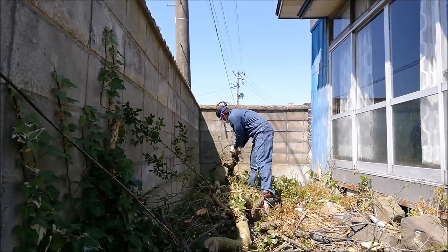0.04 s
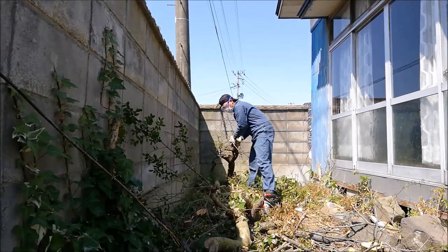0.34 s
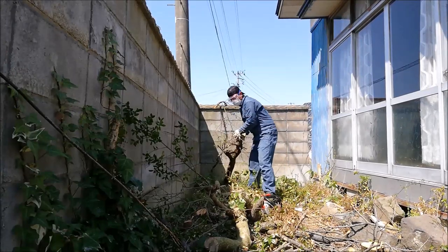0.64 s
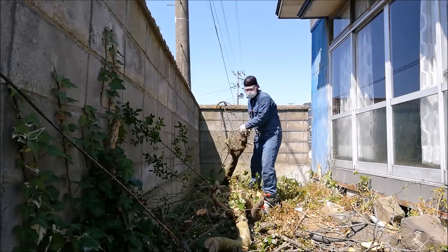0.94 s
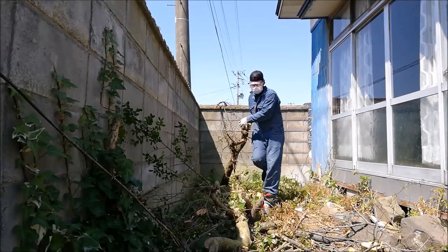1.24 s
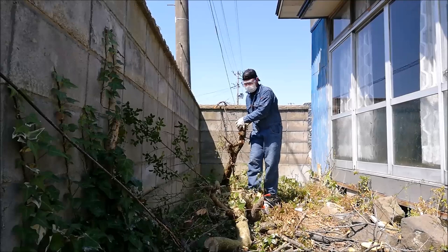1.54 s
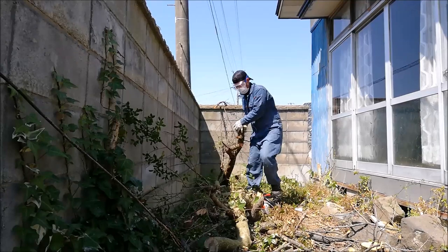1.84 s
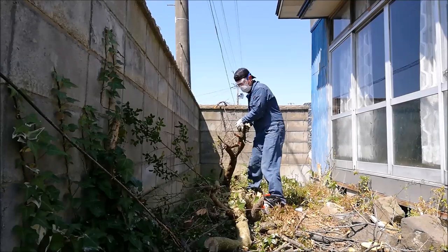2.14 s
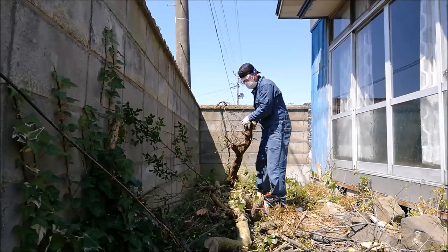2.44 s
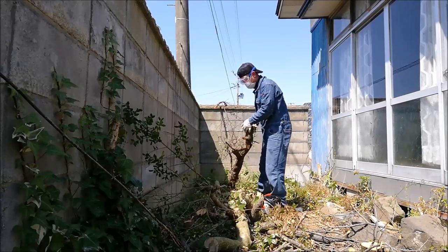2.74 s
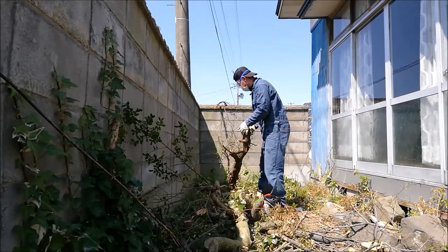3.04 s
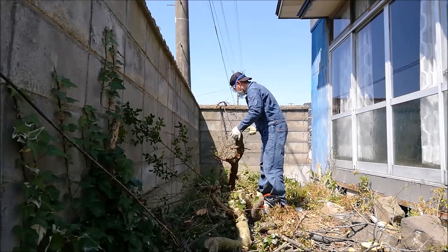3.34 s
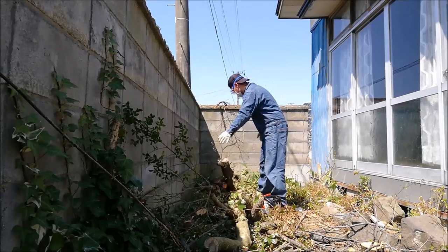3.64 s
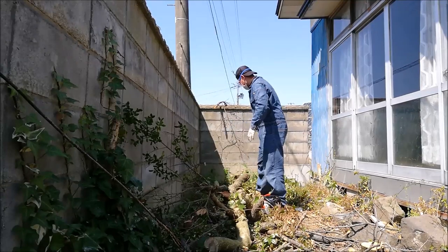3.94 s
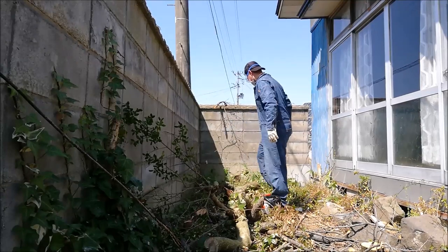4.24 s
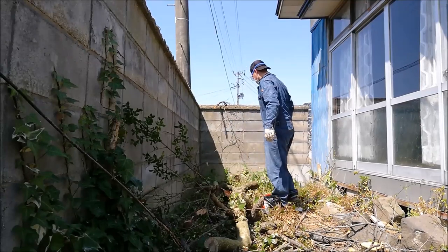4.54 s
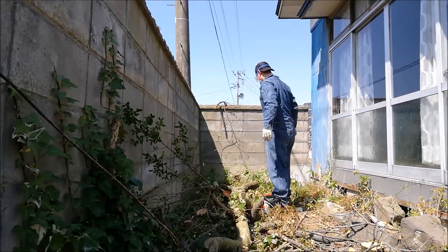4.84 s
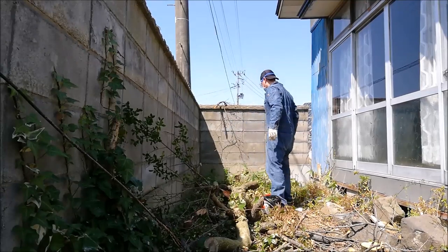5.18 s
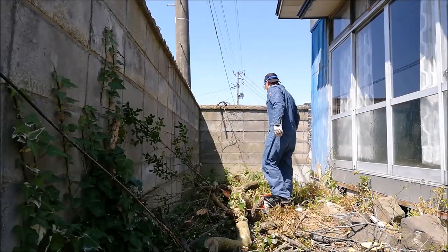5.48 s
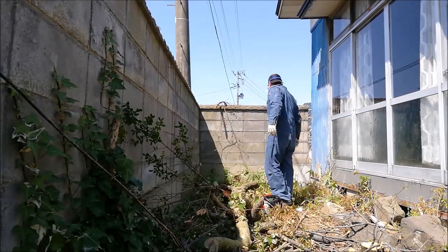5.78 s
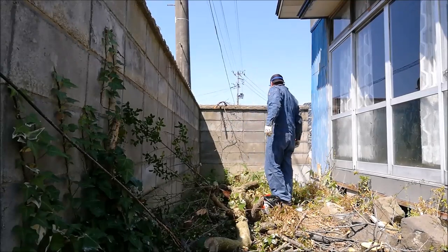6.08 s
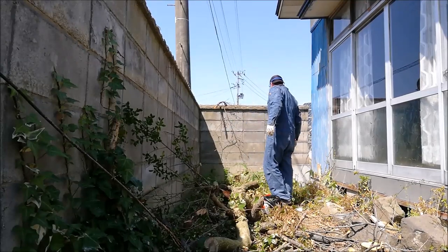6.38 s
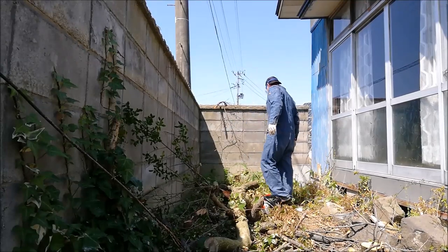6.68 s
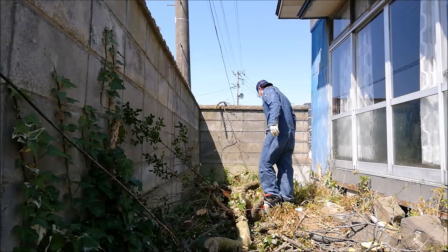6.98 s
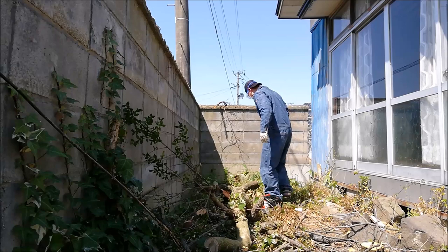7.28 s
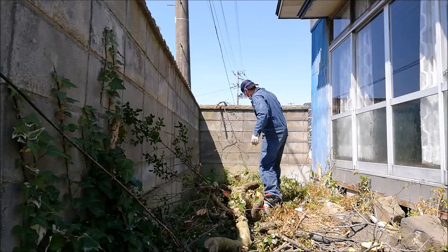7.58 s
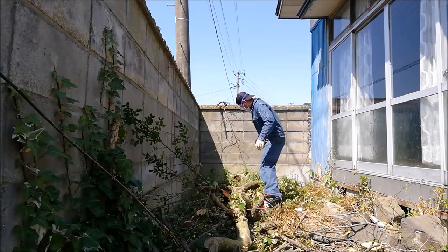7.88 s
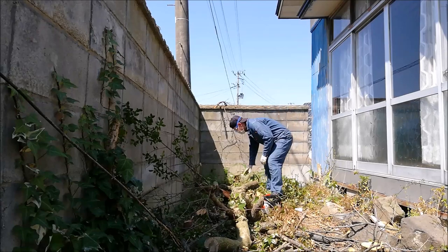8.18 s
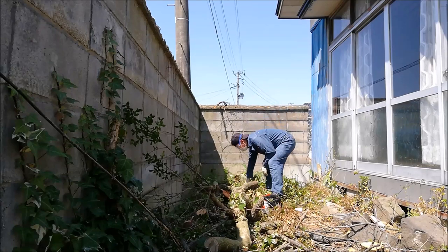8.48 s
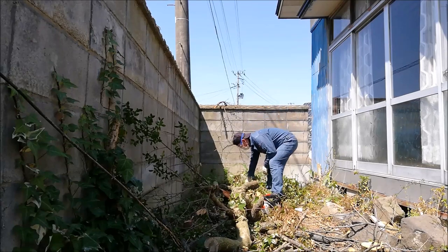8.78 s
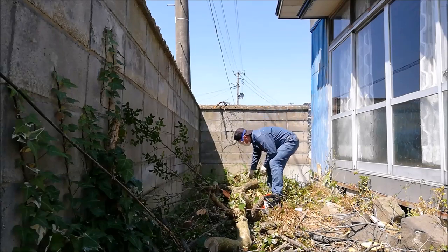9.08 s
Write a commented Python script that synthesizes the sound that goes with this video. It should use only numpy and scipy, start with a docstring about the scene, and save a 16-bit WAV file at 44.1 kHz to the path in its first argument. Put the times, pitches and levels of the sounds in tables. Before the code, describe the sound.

Close by in a narrow walled yard, a dry cut branch is dragged through brush, with crackling leaves, scraping twigs and sharp snaps. It drops with a bright clink and a short crash. Feet then tread on the litter and wood knocks dully underfoot. A faint machine hum and far traffic continue behind, and a distant engine swells in the second half. The stereo is wide, with quick echoes.

```python
"""Leaves crackle and twigs scrape and snap as a dry cut branch is dragged through brush and dropped.
Then feet tread about on the litter, wood knocks underfoot and hard stubs clink on stone.
The place is a narrow walled yard: the work is close by, heard in wide stereo,
and the walls throw back quick echoes. Behind it a machine hums steadily over far traffic,
and a distant engine swells and drones."""
import sys
import numpy as np
from scipy import signal
from scipy.fft import rfft, irfft
from scipy.io import wavfile

SR = 44100
rng = np.random.default_rng(int(sys.argv[2]) if len(sys.argv) > 2 else 0)


def transcribe(signal):
    """Save signal, clipped to [-1, 1], as a 16-bit WAV file at the path in sys.argv[1]."""
    frames = np.atleast_2d(signal).T
    limited = np.clip(frames, -1, 1)
    pcm = np.round(limited * 32767).astype(np.int16)
    wavfile.write(sys.argv[1], SR, pcm)


N = 411000
TIME = np.arange(N) / SR


def from_db(db):
    """Decibels to gain."""
    return 10 ** (np.asarray(db) / 20)


def summed_db(gains):
    """Level of unrelated sounds together: their powers add."""
    return 10 * np.log10(sum(gain ** 2 for gain in gains) + 1e-12)


def unit_rms(x):
    """Scale to an rms of 1."""
    return x / np.sqrt(np.mean(x ** 2) + 1e-20)


def in_time(rows):
    """Each column of a (time, values...) table at every sample."""
    times, *columns = np.transpose(rows)
    return [np.interp(TIME, times, column) for column in columns]


def drift(rate_hz):
    """Smooth random wander of spread 1, mostly slower than rate_hz."""
    step, settle = 40, 2000
    pole = np.exp(-2 * np.pi * rate_hz * step / SR)
    noise = rng.standard_normal(N // step + settle + 2)
    slow = signal.lfilter([1], [1, -2 * pole, pole * pole], noise)[settle:]
    return np.interp(np.arange(N) / step, np.arange(len(slow)), unit_rms(slow))


def response(spectrum, size=8192):
    """Causal (minimum-phase) impulse response of a (frequency, level) table."""
    hz, db = np.transpose(spectrum)
    grid = np.maximum(np.arange(size // 2 + 1) * SR / size, 1)
    cepstrum = irfft(np.log(from_db(np.interp(np.log(grid), np.log(hz), db))))
    cepstrum[1:size // 2] *= 2
    cepstrum[size // 2 + 1:] = 0
    return irfft(np.exp(rfft(cepstrum)))


def through(x, impulse):
    """Pass a sound through an impulse response."""
    return signal.oaconvolve(x, impulse)[:N]


def colour(x, spectrum):
    """Give a spectrum to white input, keeping its power."""
    impulse = response(spectrum)
    return through(x, impulse / np.linalg.norm(impulse))


def wide_noise(spectrum, side_db):
    """Stereo noise of one colour, rms 1 in the middle."""
    mid, side = [colour(rng.standard_normal(N), spectrum) for _ in range(2)]
    return mid + from_db(side_db) * side * [[1], [-1]]


def gesture(start, length, db, attack_s, release_db_per_s):
    """Gain that builds up smoothly, holds to the end of its length and dies away."""
    t = TIME - start
    rise = np.sin(np.pi / 2 * np.clip(t / attack_s, 0, 1)) ** 2
    return rise * from_db(db - np.minimum(release_db_per_s * np.maximum(t - length, 0), 200))


def placed(sounds):
    """Lay (time [s], gain [dB], sound) on the time line."""
    out = np.zeros(N + SR)
    for start, db, sound in sounds:
        first = int(start * SR)
        out[first:first + len(sound)] += from_db(db) * sound
    return out[:N]


def open_air():
    """A faint, wide wash of air over the yard."""
    # colour of the air: (frequency [Hz], relative level [dB])
    spectrum = [(60, -100), (180, -77.5), (300, -82.5), (450, -88), (700, -95.5), (1000, -94),
                (1320, -90.5), (1700, -95), (3500, -95), (5000, -99), (7000, -104), (11000, -103),
                (13000, -111), (16000, -116)]
    return from_db(-57) * wide_noise(spectrum, side_db=-0.5)


def far_traffic():
    """Rumble from far beyond the walls, nearly the same at both microphones."""
    # colour of the rumble: (frequency [Hz], relative level [dB])
    spectrum = [(12, -8), (28, 1), (48, 2), (68, 2.5), (95, 4), (110, 1.5), (124, 7), (140, -7), (185, -8),
                (230, -21.5), (400, -41), (2000, -78)]
    # its rise and fall: (time [s], level [dB])
    levels = [(0, -42.5), (.4, -46), (5.3, -47.5), (5.9, -42), (8.3, -46.5), (9.32, -47)]
    return from_db(in_time(levels)[0]) * wide_noise(spectrum, side_db=-19)


def distant_engine():
    """An engine revs twice and runs down; from afar only its firing tone and the octave arrive."""
    # the engine's run: (time [s], firing rate [Hz], level [dB])
    revs = [(6.12, 55, -54), (6.32, 64.2, -30.5), (6.45, 69.7, -29.5), (6.58, 67, -25.5),
            (6.66, 61.3, -31.5), (6.78, 57.8, -42), (7.0, 57.34, -43.5), (7.4, 61.66, -37.5),
            (7.85, 60.6, -40.5), (8.1, 51.2, -48), (8.85, 49.4, -52), (9.32, 37, -59)]
    hz, db = in_time(revs)
    start_s, onset_s, waver_db = revs[0][0], 0.092, 1.0
    running = np.clip((TIME - start_s) / onset_s, 0, 1)
    phase = 2 * np.pi * np.cumsum(hz) / SR
    tone = np.sqrt(2) * (np.sin(phase) + from_db(-23.5) * np.sin(2 * phase))
    return running * from_db(db + waver_db * drift(2.8)) * tone


def drones(waver_db=3):
    """Fainter low tones in the distance swell, waver and fade."""
    # each drone: (start [s], length [s], level [dB], frequency [Hz])
    swells = [(2.603, 0.44, -45, 89.2), (8.056, 1, -57, 101.2)]
    tones = np.zeros(N)
    for start, length, db, hz in swells:
        gain = gesture(start, length, db, attack_s=0.2, release_db_per_s=78)
        tones += gain * np.sqrt(2) * np.sin(2 * np.pi * hz * TIME)
    return tones * from_db(waver_db * drift(2.4))


def tyres(nearest_s=7.8, width_s=0.87):
    """The distant vehicle's tyres hiss faintly as it passes, loudest when nearest."""
    # colour of tyres on the road: (frequency [Hz], relative level [dB])
    spectrum = [(150, -4), (450, -2.5), (950, 0), (1600, -0.5), (2800, -4.5), (6000, -23), (16000, -49)]
    relative_distance = np.hypot(1, (TIME - nearest_s) / width_s)
    return from_db(-59.5) / relative_distance * wide_noise(spectrum, side_db=6) / np.sqrt(2)


def machine_hum(hz=205.1, waver_db=0.17):
    """The hum stands between the walls, so the two microphones get it at different phase and level."""
    # the hum midway between the microphones: (time [s], level [dB])
    levels = [(0, -47.5), (2.6, -46.5), (5.8, -48.5), (6.5, -50), (9.32, -51)]
    mic_radians, mic_db = np.array([[-0.39], [0.39]]), np.array([[1.5], [-1.5]])
    tone = np.sqrt(2) * np.sin(2 * np.pi * hz * TIME + mic_radians)
    return from_db(in_time(levels)[0] + waver_db * drift(6.1) + mic_db) * tone


def yard(x, wet_db, t60_s, build_s, places):
    """Direct sound and echoes off ground and close walls, shifting as the source wanders among places."""
    # the left microphone's port rings in the treble: (frequency [Hz], left minus right [dB])
    port_balance = [(200, -3.5), (400, -4), (1300, -0.5), (4400, -0.5), (6500, 2), (8400, 1), (10300, 7),
                    (11600, 0.5), (15000, -1.5)]
    left_lag_s = 0.00061  # the direct sound reaches the left channel after the right, widening the stereo
    t, channels = TIME[:SR // 5], []
    decay = from_db(-60 * t / t60_s) * (1 - np.exp(-t / build_s))
    for side in (1, -1):  # left, right
        shares = np.array([drift(20.1) for _ in range(places)])
        shares /= np.linalg.norm(shares, axis=0)
        heard = np.roll(x, side * int(left_lag_s * SR / 2))
        for share in shares:
            echoes = rng.standard_normal(len(t)) ** 3 * decay  # cubed: a few echoes stand out
            heard = heard + from_db(wet_db) * through(x * share, echoes / np.linalg.norm(echoes))
        port = response([(hz, side * db / 2) for hz, db in port_balance], size=512)
        channels.append(through(heard, port) / np.hypot(1, from_db(wet_db)))
    return np.array(channels)


def run_of_cracks(length, per_s, follow_db):
    """One crack and a dying run of smaller ones."""
    t = TIME[:SR // 6]
    cracking = rng.random(len(t)) < per_s / SR
    run = cracking * rng.uniform(0.48, 1, len(t)) * rng.choice([-1, 1], len(t))
    run *= from_db(follow_db) * np.exp(-(t / length) ** 2)
    run[0] = 1
    return run


def struck(hits, modes, per_s, follow_db):
    """Each blow chatters briefly into damped modes, pitched to the size of the piece."""
    t, sounds = TIME[:SR // 10], []
    for start, db, length, pitch in hits:
        ring = sum((-1) ** k * from_db(level - 60 * t / t60) * np.sin(2 * np.pi * hz * pitch * t)
                   for k, (hz, level, t60) in enumerate(modes))
        chatter = run_of_cracks(length, per_s, follow_db)
        sounds.append((start, db, signal.fftconvolve(chatter, ring / np.abs(ring).max())))
    return placed(sounds)


def wood_knocks():
    """Pieces of wood knock dully and grind on the litter."""
    # each knock: (time [s], relative level [dB], grinding time [s], pitch [ratio])
    hits = [(.175, -49, 0.027, 0.42), (.252, -43.5, 0.015, 0.36), (.972, -44, .015, 0.77),
            (1.667, -41, 0.024, 0.84), (1.703, -35, 0.0098, 0.92), (1.851, -45.5, .008, 0.47),
            (2.14, -44.5, 0.034, 0.73), (2.752, -46.5, 0.011, 1.37), (3.588, -44, .004, 1.43),
            (3.739, -36, 0.095, 1.7), (3.82, -42.5, 0.036, 0.28), (3.872, -40, 0.017, 0.324),
            (3.88, -34.5, 0.018, 0.93), (4.07, -37, 0.026, 2.03), (5.109, -47, 0.032, 1.04),
            (5.155, -45.5, 0.063, 1.23), (5.248, -33.5, 0.018, 1.01), (7.893, -38.5, 0.0078, 1.1),
            (8.15, -46, 0.086, 0.97), (8.259, -38, 0.025, 0.95)]
    # modes of the wood: (frequency [Hz], relative level [dB], t60 [s])
    modes = [(503, -17, 0.026), (870, -4.5, 0.02), (1048, -0.5, 0.014), (1320, 0, 0.015), (1635, -9, 0.014),
             (2310, -5.5, 0.0061)]
    return from_db(5.5) * struck(hits, modes, per_s=1300, follow_db=-6.5)


def stub_clinks():
    """Hard stubs strike stone and ring brightly."""
    # each clink: (time [s], level [dB], chatter time [s], pitch [ratio])
    hits = [(3.5885, -19.5, .007, 1.02), (3.604, -24.5, .004, 0.9), (4.661, -37, 0.006, 0.81),
            (4.664, -32, 0.016, 2.3)]
    # modes of a stub: (frequency [Hz], relative level [dB], t60 [s])
    modes = [(1930, -4, 0.007), (2680, 4.5, 0.009), (3800, 2, 0.0059), (4710, 2, 0.042), (5110, 0, 0.047),
             (5260, -15, 0.092), (5610, -5, 0.027)]
    return struck(hits, modes, per_s=980, follow_db=-7.5)


def twig_snaps():
    """A twig breaks with one sharp crack, then its fibres go on tearing."""
    # each break: (time [s], relative level [dB], tearing time [s])
    breaks = [(0.051, -23, 0.022), (0.411, -12.5, 0.0062), (.458, -21, 0.0097), (.552, -22.5, 0.015),
              (0.83, -19, .003), (0.839, -13.5, 0.0083), (0.9764, -26, 0.0026), (1.324, -27, 0.018),
              (1.669, -30, 0.0077), (1.853, -29.5, 0.0038), (2.142, -29.5, 0.024), (2.2863, -31, 0.01),
              (2.404, -38, .012), (2.752, -45, 0.017), (3.5894, -25.5, 0.0085), (3.678, -26, 0.011),
              (3.707, -22, 0.0042), (3.7455, -13, 0.0031), (3.8134, -18.5, 0.017), (4.059, -25, 0.036),
              (4.662, -28.5, 0.013), (4.8163, -40, 0.011), (5.111, -43, 0.0087), (5.248, -32, 0.0088),
              (6.995, -34, 0.022), (7.381, -42, 0.014), (8.2638, -27.5, 0.008)]
    # colour of a snap: (frequency [Hz], relative level [dB])
    spectrum = [(400, -21), (1500, -22), (4000, -4.5), (6500, -6), (8500, 3.5), (10400, 7.5), (12000, 2),
                (16000, -11)]
    cracks = placed((start, db, run_of_cracks(length, per_s=1300, follow_db=-2))
                    for start, db, length in breaks)
    return from_db(11) * colour(cracks, spectrum)


def ground_drags(rise_hz_per_s=520):
    """The limb, later a boot, rasps over the ground in a resonance that rises as the weight comes off."""
    # each drag: (start [s], length [s], level [dB], starting resonance [Hz])
    drags = [(1.199, 0.39, -59, 1562), (7.351, .55, -63, 2007)]
    out = np.zeros(N)
    for start, length, db, start_hz in drags:
        phase = 2 * np.pi * np.cumsum(start_hz + rise_hz_per_s * (TIME - start)) / SR
        rasp = drift(220) * np.cos(phase) + drift(220) * np.sin(phase)  # a broad band of noise
        out += gesture(start, length, db, attack_s=0.061, release_db_per_s=160) * rasp
    return out


def movement():
    """Levels in dB that drive leaves, twigs and thick wood as the branch and the feet move."""
    # branch or hand sweeps the brush: (start [s], length [s], leaf level [dB], twigs over leaves [dB])
    sweeps = [(0, 0.58, -36.5, -7), (0.32, .07, -38, -8), (0.744, 0.12, -38, -6), (0.882, 0.45, -46, -5),
              (1.415, 0.12, -53, -11), (1.554, 0.078, -43.5, -7), (3.56, 0.18, -49, 0.5),
              (4.022, 0.025, -33.5, -2), (7.821, 0.11, -49, -2.5), (8.819, 0.34, -52, -6),
              (9.028, 0.19, -46.5, -8.5)]
    # feet press into the litter: (start [s], length [s], leaf level [dB])
    treads = [(2.102, 0.22, -45), (2.347, 0.2, -40.5), (2.433, 0.068, -43), (4.174, 0.14, -46),
              (4.247, 0.078, -45.5), (4.375, 0.034, -50.5), (4.65, 0.066, -53.5), (5.044, .15, -51),
              (5.527, 0.19, -49.5), (6.8, 0.13, -55), (6.935, 0.14, -49.5), (7.927, .15, -50),
              (8.083, 0.13, -39.5)]
    # bent stems go on stirring between moves: (start [s], length [s], leaf level [dB])
    stirs = [(0.552, 0.22, -50.5), (1.35, 1.78, -58), (3.055, 0.22, -64.5), (4.4, 0.36, -62.5),
             (4.946, .6, -61.5), (7.11, 0.19, -58), (7.607, 0.21, -63.5), (8.401, 1.02, -58)]
    # the heavy butt grinds on the ground as the branch is hauled upright
    haul = gesture(start=0.18, length=1.15, db=-56.5, attack_s=0.15, release_db_per_s=21)
    # the branch is let go and crashes into the brush
    fall = gesture(start=3.72, length=0.14, db=-34, attack_s=0.025, release_db_per_s=115)
    fits = from_db(2.5 * drift(10))
    # each move: (leaf gain, twigs over leaves [dB])
    moves = [(gesture(*row, attack_s=0.039, release_db_per_s=180), share) for *row, share in sweeps]
    moves += [(gesture(*row, attack_s=0.031, release_db_per_s=168), -11.5) for row in treads]
    moves += [(fits * gesture(*row, attack_s=0.065, release_db_per_s=28.5), -5) for row in stirs]
    moves.append((fall, -6))
    leaf_db = summed_db(gain for gain, _ in moves)
    twig_db = summed_db(gain * from_db(share) for gain, share in moves)
    # thick wood crunches under every move, but swings half as many dB as the leaves
    wood = from_db(-56 + 0.5 * (leaf_db + 41))
    return leaf_db, twig_db, summed_db([wood, haul, fall * from_db(-12.5)])


def friction(level_db, per_s, spread_db, clump_db, reference_db=-45.5):
    """Tiny stick-slip cracks in clumps: per_s of them at the reference level, more when pushed harder."""
    chance = np.clip(per_s * from_db((level_db - reference_db) / 2) / SR, 1e-4, 1)
    sizes = from_db(spread_db * np.minimum(rng.exponential(1, N), 4)) * rng.choice([-1, 1], N)
    cracks = (rng.random(N) < chance) * sizes / np.sqrt(chance)
    return from_db(level_db) * unit_rms(cracks * from_db(clump_db * drift(31)))


def brush():
    """Dry leaves crackle, twigs scrape and thick wood crunches as they rub past each other."""
    # colours of the three materials: (frequency [Hz], relative level [dB])
    leaf_spectrum = [(3000, -24.5), (6000, -11), (7500, -9.5), (9000, -4.5), (10400, 0.5), (11500, -2.5),
                     (13000, -9.5), (16000, -19.5)]
    twig_spectrum = [(900, -22.5), (2000, -10.5), (2700, -4.5), (3500, 1.5), (4800, 0.5), (6500, -4.5),
                     (9000, -0.5), (15000, -29.5)]
    wood_spectrum = [(120, -4), (300, -2), (700, -5.5), (1100, -2), (1900, -6), (3000, -3.5), (7000, -43.5),
                     (16000, -46)]
    leaf_db, twig_db, wood_db = movement()
    leaves = colour(friction(leaf_db, per_s=1800, spread_db=1, clump_db=2), leaf_spectrum)
    twigs = colour(friction(twig_db, per_s=3200, spread_db=3.5, clump_db=2), twig_spectrum)
    wood = colour(friction(wood_db, per_s=3000, spread_db=3, clump_db=-1.5), wood_spectrum)
    return from_db(0.5) * leaves + from_db(2) * twigs + from_db(1.5) * wood


def scene():
    """The work close by, echoing between the walls, with the neighbourhood behind it."""
    rustle = yard(brush() + ground_drags(), wet_db=6, t60_s=0.15, build_s=0.0014, places=4)
    blows = twig_snaps() + wood_knocks() + stub_clinks()
    foreground = rustle + yard(blows, wet_db=-2.5, t60_s=0.12, build_s=0.0028, places=3)
    background = open_air() + far_traffic() + distant_engine() + drones() + tyres() + machine_hum()
    return foreground + background


def record(dry):
    """A steep low-pass cuts the highest treble from both microphones."""
    cutoff_hz = 15850
    return signal.sosfilt(signal.ellip(12, 0.1, 80, cutoff_hz, fs=SR, output="sos"), dry)


dry = scene()
out = record(dry)
transcribe(out)
```